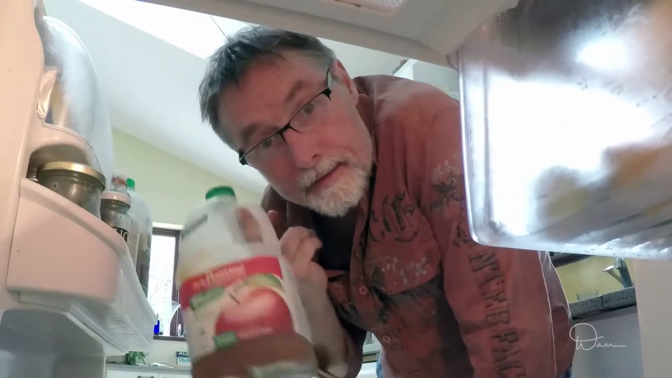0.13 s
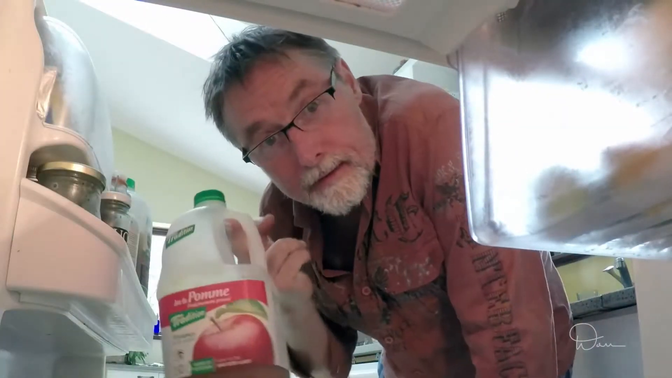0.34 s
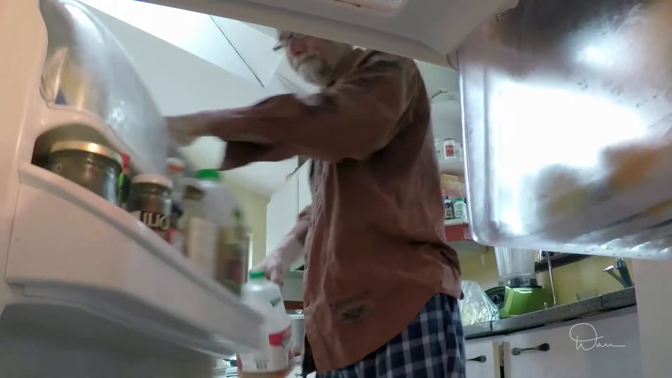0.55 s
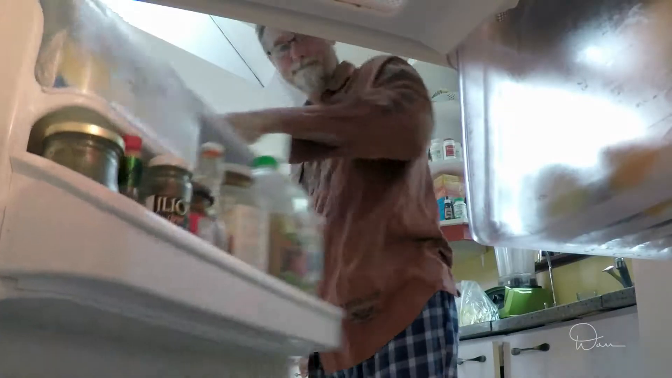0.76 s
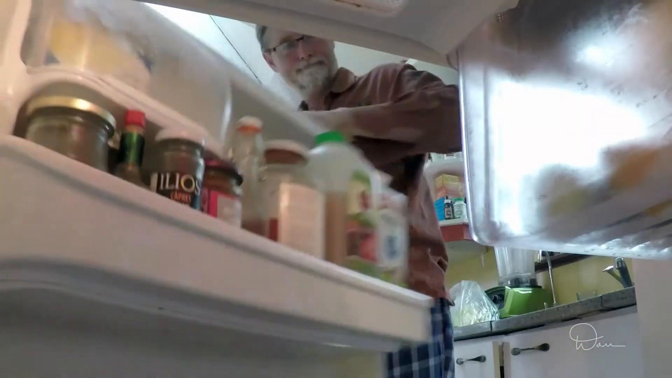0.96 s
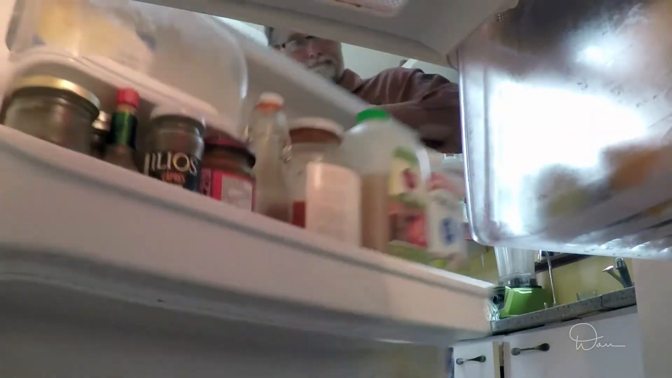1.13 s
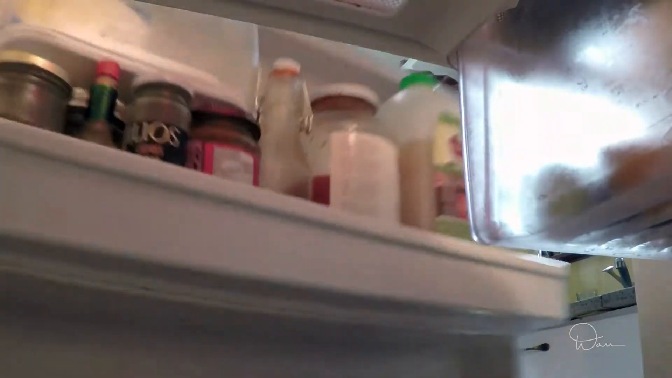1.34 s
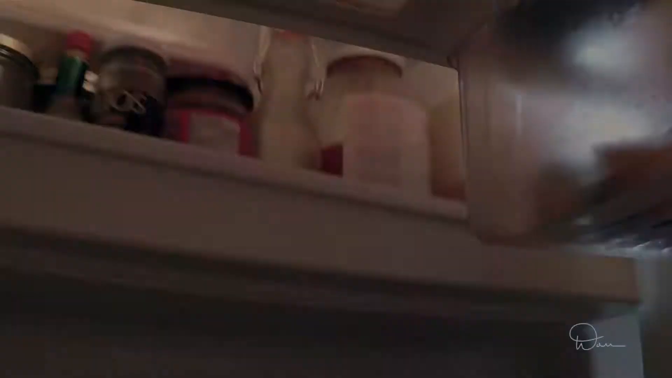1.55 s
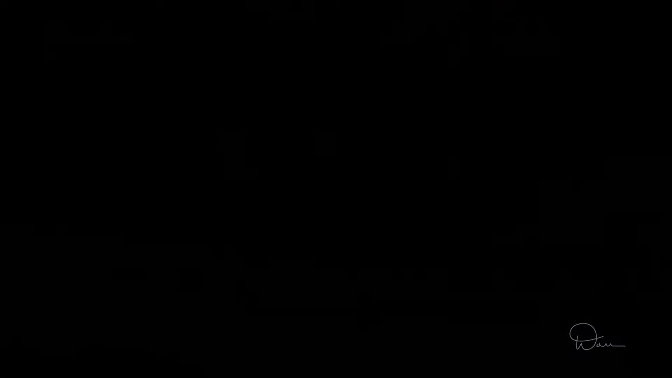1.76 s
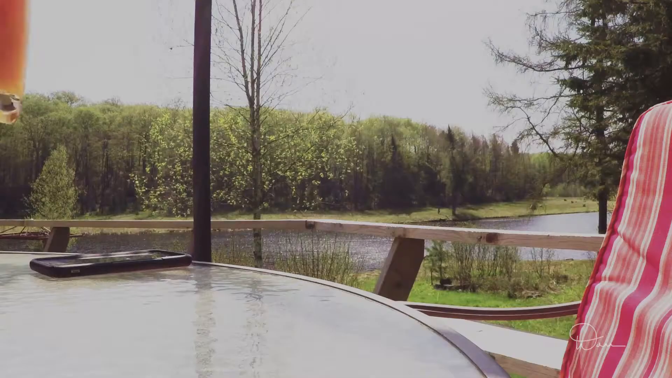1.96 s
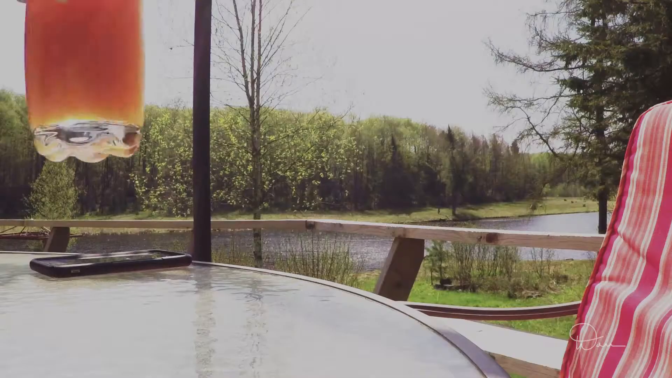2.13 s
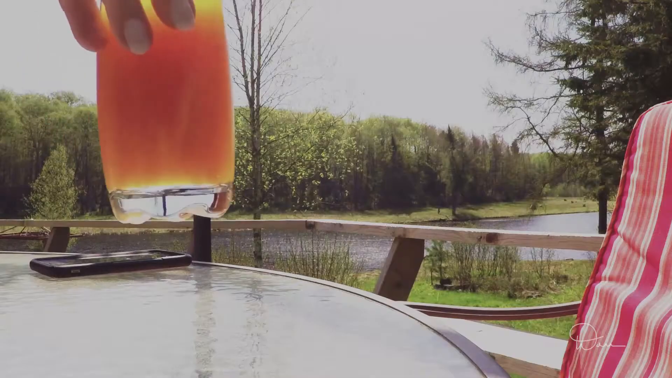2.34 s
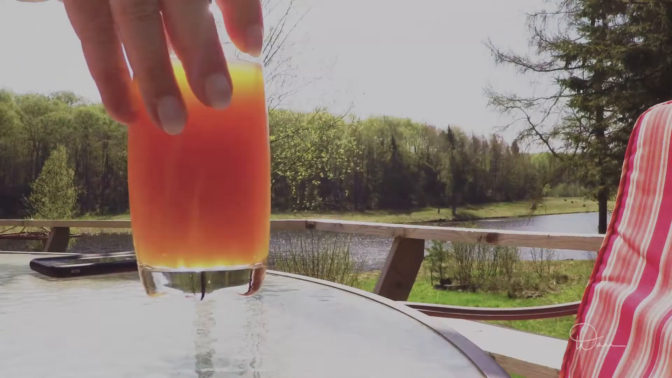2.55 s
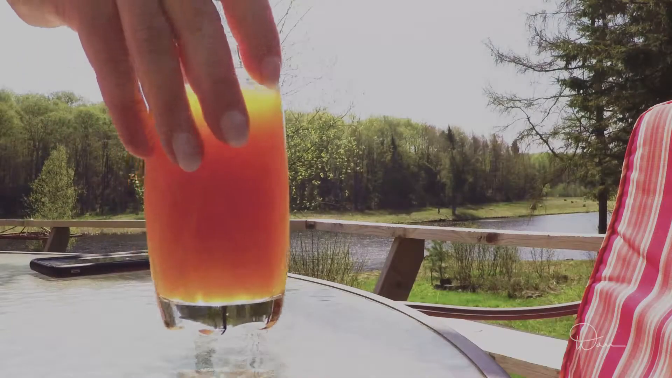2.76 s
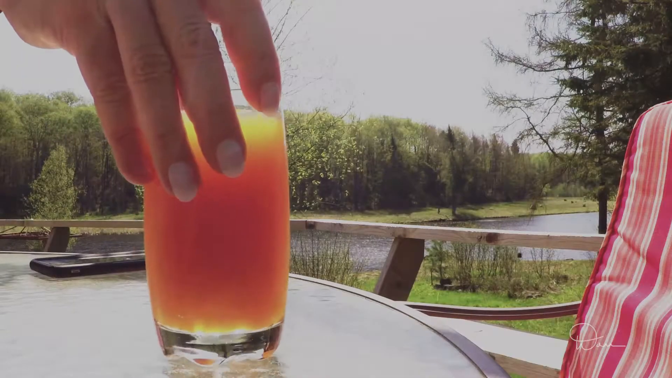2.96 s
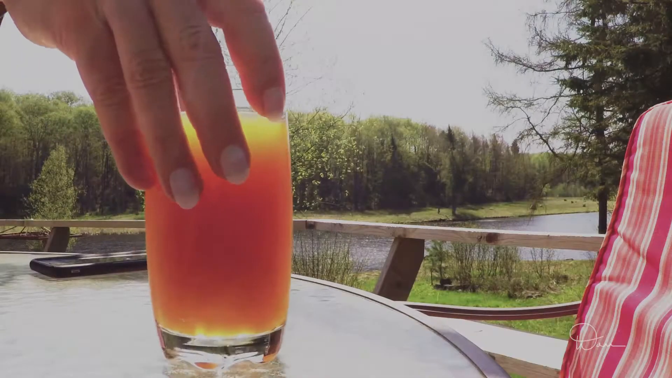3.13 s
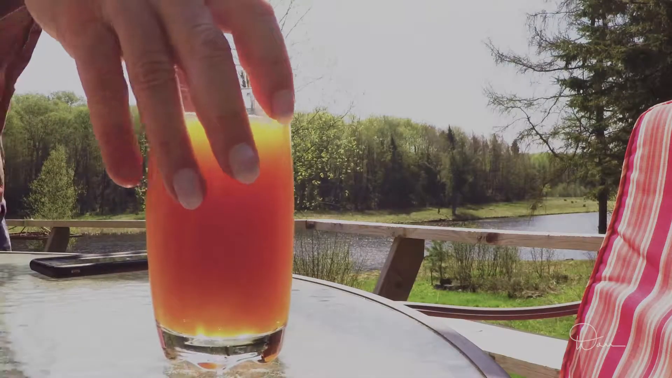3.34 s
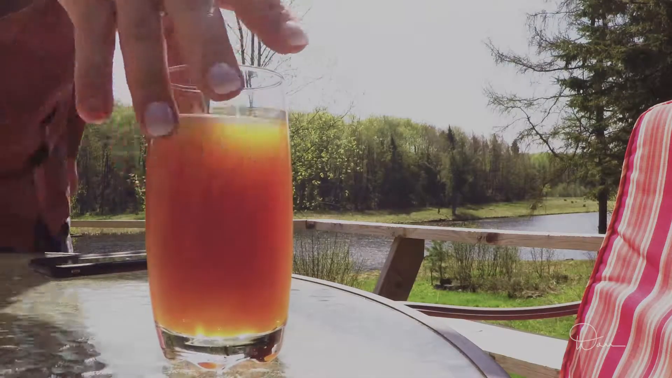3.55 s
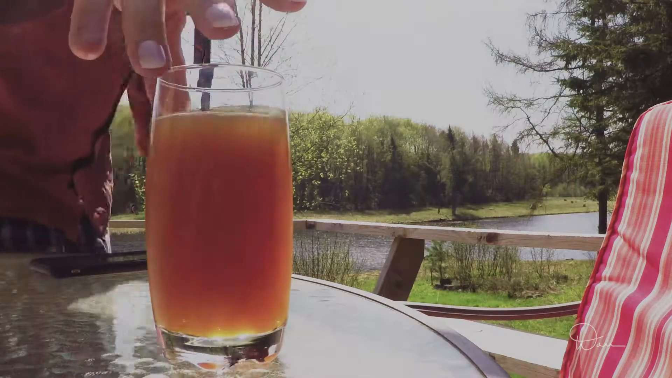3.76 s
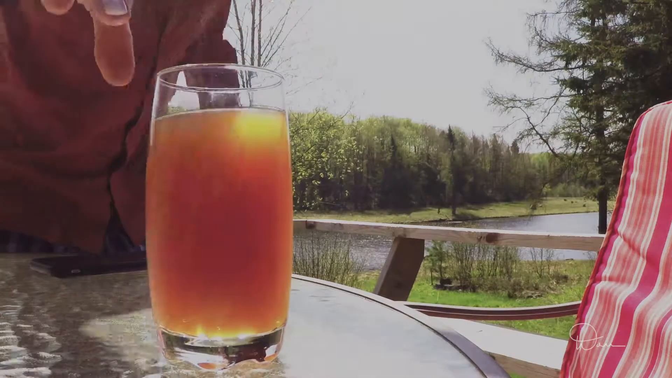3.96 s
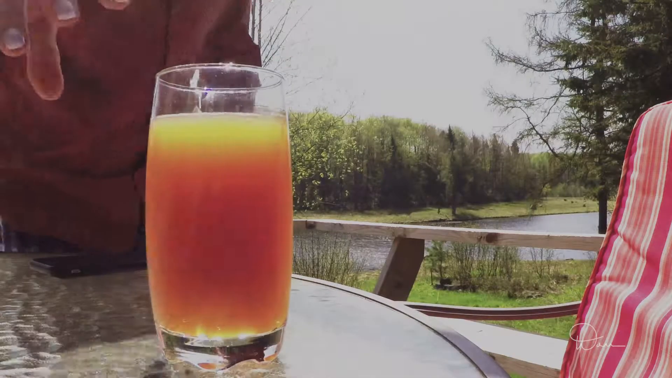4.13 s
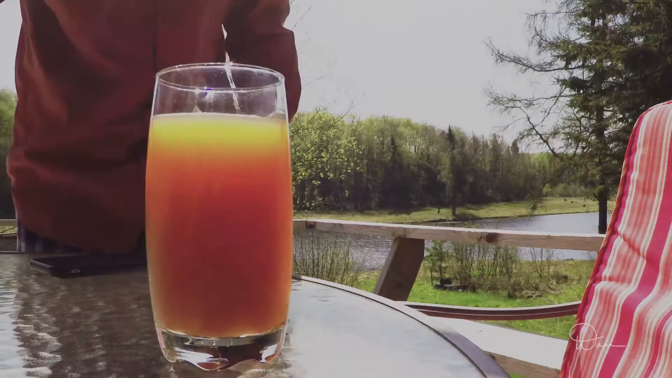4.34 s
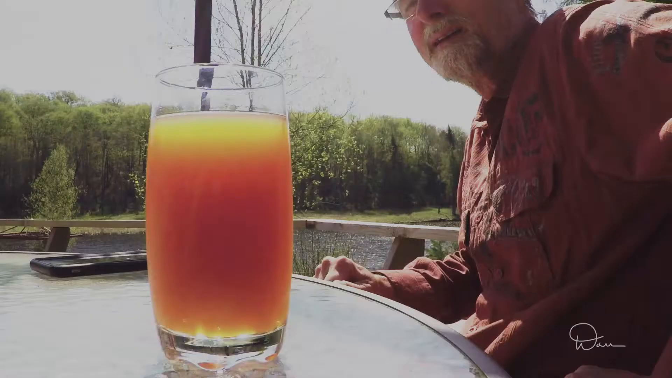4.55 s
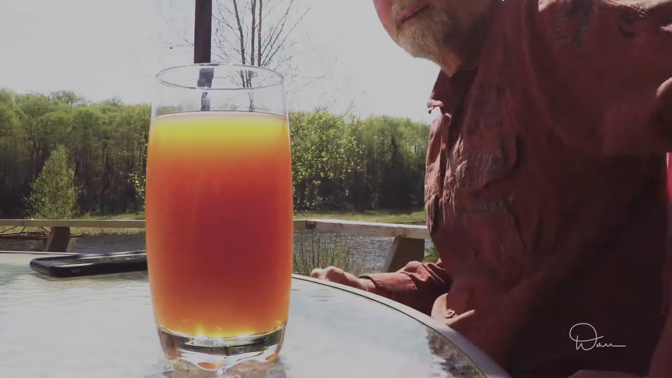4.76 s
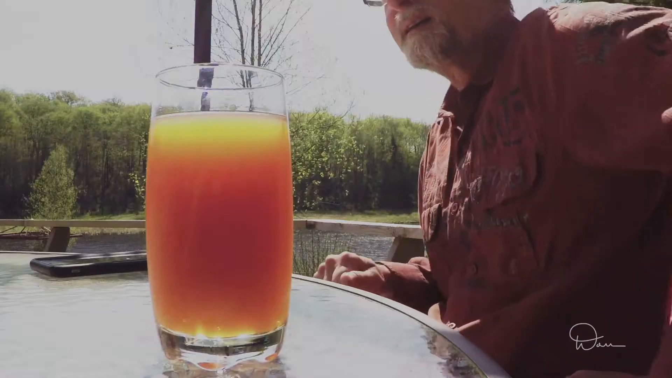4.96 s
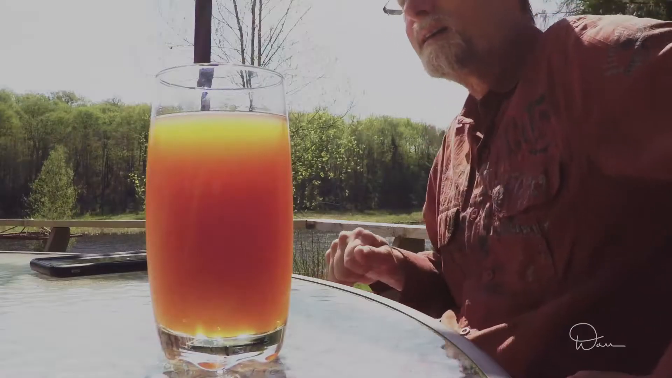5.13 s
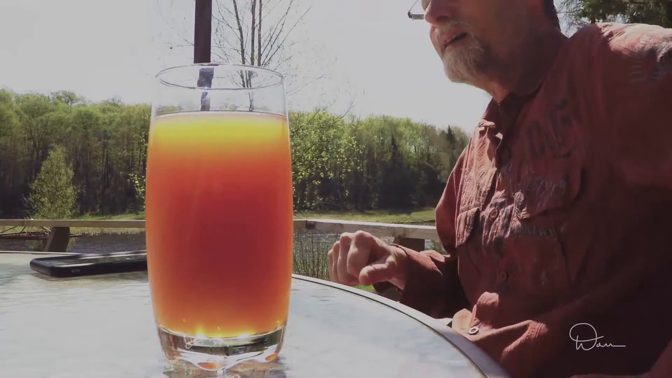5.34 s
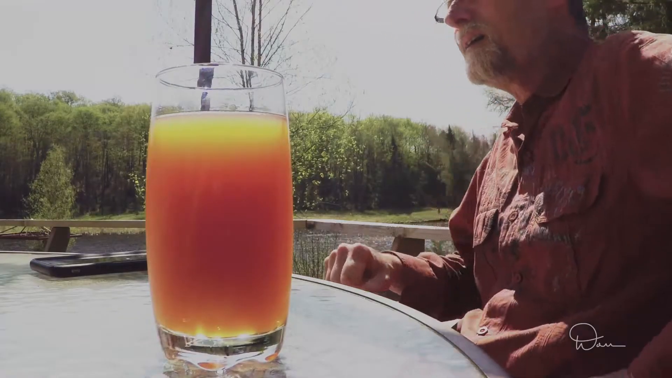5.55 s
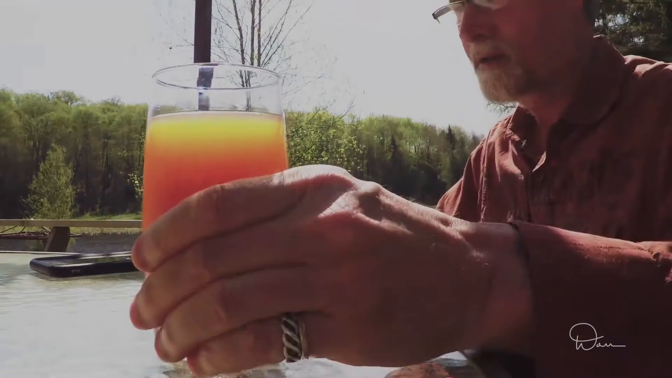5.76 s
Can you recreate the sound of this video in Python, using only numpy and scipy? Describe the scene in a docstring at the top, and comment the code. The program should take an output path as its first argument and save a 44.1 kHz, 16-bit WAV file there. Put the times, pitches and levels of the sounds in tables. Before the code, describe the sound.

A few light knocks, a bottle clink and a short scrape sound close to a microphone inside a refrigerator. Then the door latches with a loud thud, shaking the jars. Quiet open air fades in, with hiss, wind rumble and faint insects. A glass is set down on a glass table, a chair knocks and rustles softly on a wooden deck, and a finger ring lightly taps the glass.

```python
"""A refrigerator door, heard from inside, latches and slams after knocks, clinks and a shelf's scrape;
the jars rattle. Each impact excites damped modes; the scrape is stick-slip friction. A hard cut leads
to a wooden deck that fades in: a glass is set on a glass table, a chair knocks and rustles, a step
thumps and a finger ring taps the glass. An insect trills and chirps over hum, hiss, far insects, a soft
pulse and a low rumble: wind on the microphone, swelling as the deck rumbles after the thumps."""
import sys
import numpy as np
from scipy import signal
from scipy.io import wavfile
from scipy.ndimage import uniform_filter1d

SR = 44100
rng = np.random.default_rng(int(sys.argv[2]) if len(sys.argv) > 2 else 0)


def output_pcm(signal):
    """Save a mono or channel-first signal as 16-bit PCM at the path in sys.argv[1].

    Samples are clipped to [-1, 1] before scaling.
    """
    pcm = np.clip(np.atleast_2d(signal).T, -1, 1) * 32767
    wavfile.write(sys.argv[1], SR, np.round(pcm).astype(np.int16))


N = 255780
TIME = np.arange(N) / SR
EDGES_HZ = 22 * 2 ** np.arange(0, 9.7, 1 / 3)
CENTRES_HZ = np.sqrt(EDGES_HZ[1:] * EDGES_HZ[:-1])
CUT_S, HISS_DB = 2.18, -67.5

def from_db(db):
    """Amplitude ratio of a level in decibels."""
    return 10 ** (np.asarray(db) / 20)

def rms_one(x):
    """Normalisation to unit rms."""
    return x / np.sqrt(np.mean(x ** 2) + 1e-20)

def in_time(rows):
    """Linear interpolation of each column over time."""
    times, *columns = np.transpose(rows)
    return [np.interp(TIME, times, column) for column in columns]

def at_hz(points, hz=CENTRES_HZ):
    """Interpolation on a log-frequency axis."""
    known_hz, values = np.transpose(points)
    return np.interp(np.log(hz), np.log(known_hz), values)

def during(start_s, end_s):
    """A time gate with 1 ms ramps."""
    return np.clip(np.minimum(TIME - start_s, end_s - TIME) * 1000, 0, 1)

def drift(rate_hz):
    """Slow random modulation: low-passed noise of unit rms."""
    r = np.exp(-80 * np.pi * rate_hz / SR)
    slow = signal.lfilter([1], [1, -2 * r, r * r], rng.standard_normal(N // 40 + 2002))[2000:]
    return np.interp(np.arange(N) / 40, np.arange(len(slow)), rms_one(slow))

def filtered(x, order, hz, kind):
    """A maximally flat filter."""
    return signal.sosfilt(signal.butter(order, hz, kind, fs=SR, output="sos"), x)

def bands(sources):
    """Third-octave analysis, the bands drawing on the sources in turn."""
    return [filtered(sources[k % len(sources)], 2, edges, "band")
            for k, edges in enumerate(zip(EDGES_HZ, EDGES_HZ[1:]))]

def colour(bank, spectrum):
    """Spectral shaping: a weighted sum of bands, at unit rms."""
    return rms_one(sum(gain * band for gain, band in zip(from_db(at_hz(spectrum)), bank)))

def grains(per_s, spread_db):
    """Shot noise: random impulses of uneven size, at unit rms."""
    sizes = from_db(spread_db * np.minimum(rng.exponential(1, N), 5)) * rng.choice([-1, 1], N)
    return rms_one(sizes * (rng.random(N) < per_s / SR))

def clicks(blows):
    """Ideal impulses from rows of time_s, level_db."""
    out = np.full(N, 1e-18)
    for s, db in blows:
        out[round(s * SR)] += from_db(db)
    return out

def ring(drive, modes):
    """Modal superposition: damped resonators of alternating sign share one drive."""
    out = np.zeros(N)
    for k, (hz, db, t60) in enumerate(modes):
        r, w = from_db(-60 / (max(t60, .003) * SR)), 2 * np.pi * hz / SR
        response = signal.lfilter([0, np.sin(w)], [1, -2 * r * np.cos(w), r * r], drive)
        out += (-1) ** k * from_db(db) * response
    return out

def mode_drives(blows, modes, spread_db):
    """Strike position weights the modes, so each gets its own uneven impulses."""
    favour_db = rng.normal(0, spread_db, (len(blows), len(modes)))
    return [clicks(np.array(blows) + np.outer(column, [0, 1])) for column in favour_db.T]

def damped(blows, modes, drop_db):
    """Contact damping: a touch lowers each ring within 10 ms."""
    return sum(ring(clicks([(s, db)]), modes) * from_db(-drop_db * ((TIME - touch_s) / 0.01).clip(0, 1))
               for s, db, touch_s in blows)

def dense_body(bank, blows, spectrum, t60s, build_s):
    """High modal density: each noise band builds through the contact, then decays at its own rate."""
    out = np.zeros(N)
    shape_db = at_hz(spectrum)
    region = np.digitize(CENTRES_HZ, [600, 3500])  # bass, middle, treble
    power = from_db(2 * shape_db) * np.diff(EDGES_HZ) / (SR / 2)
    totals_db = 10 * np.log10([power[region == k].sum() for k in range(3)])
    for s, level_db, bass_db, treble_db, t60_ratio in blows:
        at = round(s * SR)
        t = TIME[:min(N - at, SR * 3 // 4)]
        contact_s = build_s * from_db(-0.15 * treble_db)  # duller blows build more slowly
        tilt_db = level_db + np.array([bass_db, 0, treble_db]) - totals_db
        bands_db = shape_db + at_hz(list(zip([220, 1450, 7000], tilt_db)))
        for band, db, t60, hz in zip(bank, bands_db, at_hz(t60s) * t60_ratio, CENTRES_HZ):
            rise_s = max(contact_s, 1 / hz)  # lows need a cycle to build up
            envelope = np.minimum(t / rise_s, 1) * from_db(db - 60 * np.maximum(t - rise_s, 0) / t60)
            out[at:at + len(t)] += band[at:at + len(t)] * envelope
    return out

# Cabinet blows: start_s, level_db, bass_offset_db, treble_offset_db, t60_ratio
CABINET_BLOWS = [(0, -59, 0, -1.5, 5.5), (0.4, -60.5, 5, -4, 8), (0.432, -35.5, 6, 5, 0.65),
                 (0.546, -43.5, -5.5, 6.5, 0.51), (0.608, -54.5, 13, -34, 0.36),
                 (0.882, -38.5, -5, -31, 0.43), (1.024, -53.5, -22, 13, 0.58), (1.121, -51.5, 4, -5, 0.56),
                 (1.334, -51, 0.5, -14, 0.46), (1.521, -48.5, -1.5, -28, 0.35),
                 (1.61, -58, 16.5, -23.5, 0.6), (1.642, -40.5, 1.27, -17.5, 0.93),
                 (1.712, -43.5, 4.5, -19, 0.37), (1.736, -44.5, 8, -3, 0.59), (1.775, -7.5, -16, -7, 0.4),
                 (1.845, -31.5, 1.5, -2.5, 0.14), (1.854, -18.5, -2.5, 11, 0.63),
                 (1.873, -18, -1.5, 1.5, 1.3), (2.042, -35, -5, 6.5, 0.21), (2.145, -33, -12, -26.5, 0.31),
                 (2.16, -51, 11, -4, 0.57)]
# Cabinet spectrum: frequency_hz, density_db
CABINET_SPECTRUM = [(40, -41), (100, -19), (243, 0), (500, -7), (1210, -5.5), (1430, -8), (2200, -4.5),
                    (4740, -9), (5610, -15.5), (8850, -13.5), (12000, -29.5), (15400, -23.5)]
# Cabinet decay: frequency_hz, t60_s
CABINET_DECAY = [(80, 0.46), (300, 0.42), (1000, 0.41), (3000, 0.15), (8000, 0.21), (14000, 0.028)]
def cabinet_knocks(bank):
    """Impacts excite the cabinet's overlapping modes."""
    return dense_body(bank, CABINET_BLOWS, CABINET_SPECTRUM, CABINET_DECAY, build_s=0.0015)

# Fan and kitchen air: time_s, level_db
AIR_LEVELS = [(0, -56), (.35, -60), (.6, -56.5), (.85, -58.5), (2.18, -60.5)]
# Air spectrum: frequency_hz, density_db
AIR_SPECTRUM = [(30, -47.5), (75, -23.5), (242, -0.5), (397, 0), (800, -9.5), (1160, -11.5), (5000, -17.5),
                (5800, -22.5), (9000, -18), (11000, -30), (14000, -32), (15400, -42)]
def fan_air():
    """Moving air radiates broadband noise."""
    air = colour(bands(rng.standard_normal((2, N))), AIR_SPECTRUM)
    return air * from_db(in_time(AIR_LEVELS)[0] + drift(18))

# Trembling jar: pitch_hz, gain_db, t60_s
TREMBLING_MODES = [(1900, -3, 0.086), (1995, 3.5, 0.085), (2324, -8, 0.065), (3720, -12, 0.15),
                   (4500, -7, .04), (4830, -6, 0.04)]
def trembling_jar(loss_db_per_s=68):
    """Forced vibration: fading contacts with a neighbour drive a jar."""
    contacts = grains(3000, 1.0) * from_db(-76.5 - loss_db_per_s * TIME)
    return ring(contacts, TREMBLING_MODES) * (TIME < 0.4)

# Plastic bin: pitch_hz, gain_db, t60_s
BIN_MODES = [(224, -4, 0.027), (337, 1, 0.081), (645, -13.5, 0.15), (1120, -7.5, 0.073), (1746, -8, 0.042),
             (4330, -9.5, 0.046), (5040, -9.5, 0.068)]
# Bin impact: start_s, level_db
BIN_HITS = [(.435, -20.5)]
def door_bin():
    """Internal damping keeps the ring of plastic short."""
    return ring(clicks(BIN_HITS), BIN_MODES)

# Bottle: pitch_hz, gain_db, t60_s
BOTTLE_MODES = [(1930, -2.5, 0.13), (2290, -12, 0.51), (3840, -3, 0.068), (4800, -3.5, 0.14),
                (6370, 9, 0.042), (7200, -5, .04), (8900, -2.5, 0.096)]
# Bottle impact: start_s, level_db, touch_s
BOTTLE_HITS = [(0.55, -34, 0.598)]
def bottle_clink():
    """Glass vibrates freely until a contact damps it."""
    return damped(BOTTLE_HITS, BOTTLE_MODES, drop_db=30)

# Shelf friction: frequency_hz, density_db
SCRAPE_SPECTRUM = [(300, -11), (1480, 0), (3000, -1), (4800, 7.5), (5900, -5.5), (8490, 9.5), (11000, -13),
                   (15400, -9)]
def shelf_scrape(peak_s=0.9375, rise_db_per_s=124, fall_db_per_s=163):
    """Stick-slip friction: dense tiny slips swell and fade as the shelf drags."""
    slips = colour(bands([grains(4400, 0.68), grains(6000, 0.71)]), SCRAPE_SPECTRUM)
    swell_db = np.minimum(rise_db_per_s * (TIME - peak_s), fall_db_per_s * (peak_s - TIME))
    ease_db = -4.5 * during(1.045, 9)  # the load comes off
    return slips * from_db(-33 + swell_db + ease_db) * during(.885, 1.11)

# Door panel: pitch_hz, gain_db, t60_s
DOOR_MODES = [(113, -7.5, 0.5), (183.8, 1, 0.28), (242.6, -0.5, 0.3), (398, -3, 0.3), (655, -10, 0.37),
              (730, -11, 0.49), (802, -13.5, 0.2), (1038, -10.5, 0.22), (1224, -10.5, 0.24)]
# Door impacts: start_s, level_db
DOOR_HITS = [(1.646, -41.5), (1.8, -33), (1.858, -14), (1.878, -19), (1.91, -24), (1.955, -24.5)]
def door_slam():
    """Plate modes, each wavering in level as the seal presses unevenly."""
    return sum(ring(clicks(DOOR_HITS), [mode]) * from_db(3 * drift(30)) for mode in DOOR_MODES)

# Latch: pitch_hz, gain_db, t60_s
LATCH_MODES = [(1786, 0.5, 0.015), (2920, 5, 0.0022), (8974, -13, 0.013)]
# Latch impacts: start_s, level_db
LATCH_HITS = [(1.777, -5.5), (1.78, -10), (1.857, -8.5)]
def latch():
    """Heavily damped high modes are heard as clicks."""
    return ring(clicks(LATCH_HITS), LATCH_MODES)

# Jars: pitch_hz, gain_db, t60_s
JAR_MODES = [(1960, -9, 0.13), (1890, -10, 0.18), (2000, -15, 0.37), (2056, -12, 0.22), (2342, -10, 0.077),
             (2468, -11.5, 0.1), (2513, -7.5, 0.24), (4120, -16, 0.05), (5000, -12, .03), (6350, -19, .03),
             (8650, -15, .03)]
# Clearest collisions: start_s, level_db
JAR_HITS = [(1.882, -17), (1.895, -19), (1.968, -27), (1.99, -28.5), (2.046, -38.5)]
def jar_rattle(start_s=1.86, settle_s=1.983):
    """Random collisions excite cabinet and jars; the jars lean together, so each mode wavers."""
    loss_db = 28 * (TIME - start_s) + 187 * np.maximum(TIME - settle_s, 0)
    shaking = from_db(-loss_db) * (TIME > start_s)
    clatter = colour(bands([grains(3600, 1.0)]), CABINET_SPECTRUM) * from_db(-30 + 2 * drift(46))
    contacts = grains(800, 2.0) * from_db(-51) * shaking
    drives = mode_drives(JAR_HITS, JAR_MODES, spread_db=2.1)
    jars = sum(ring(contacts + drive, [mode]) * from_db(3.5 * drift(79))
               for drive, mode in zip(drives, JAR_MODES))
    return clatter * shaking + jars

# Small jar: pitch_hz, gain_db, t60_s
SMALL_JAR_MODES = [(4870, 0, 0.04), (7650, -7, 0.049)]
# Its impacts: start_s, level_db
SMALL_JAR_HITS = [(2.028, -26.5), (2.035, -30)]
def small_jar():
    """A small stiff body has high natural frequencies."""
    return ring(clicks(SMALL_JAR_HITS), SMALL_JAR_MODES)

# Carton: pitch_hz, gain_db, t60_s
CARTON_MODES = [(770, -1, 0.043), (1180, -3, 0.01)]
# Carton impacts: start_s, level_db
CARTON_HITS = [(2.148, -30), (2.161, -18.5)]
def carton():
    """Lossy walls turn impacts into dull taps."""
    return ring(clicks(CARTON_HITS), CARTON_MODES)

# Outdoor levels: time_s, rumble_db, hum_db
OUTDOOR_LEVELS = [(2.4, -67, -63.5), (3.0, -60.5, -63.5), (3.2, -49, -53), (3.8, -51.5, -64),
                  (4.1, -49.5, -60), (4.5, -55.5, -64), (5.3, -65, -60), (5.6, -63.5, -52.5),
                  (5.8, -66.5, -58)]
# Low rumble, far hum and hiss spectra: frequency_hz, density_db
RUMBLE_SPECTRUM = [(20, 20.5), (59, 10), (147, -9), (300, -36.5), (500, -69)]
HUM_SPECTRUM = [(71, 4), (120, 1.5), (243, -4), (595, -6.5), (964, -29.5), (2000, -70)]
HISS_SPECTRUM = [(530, -21), (990, -6.5), (1600, -6), (3500, -9), (4400, -11), (5200, -7), (7000, -16.5),
                 (10500, -20), (13500, -22), (15400, -9)]
def outdoor_noise():
    """Modulated noise: hum, hiss and a low wind rumble that swells as the deck rumbles after thumps."""
    rumble_db, hum_db = in_time(OUTDOOR_LEVELS)
    bank = bands(rng.standard_normal((2, N)))
    rumble = colour(bank, RUMBLE_SPECTRUM) * from_db(rumble_db + 4 * drift(3.1))
    hum = colour(bank, HUM_SPECTRUM) * from_db(hum_db + 3 * drift(27))
    hiss = colour(bank, HISS_SPECTRUM) * from_db(HISS_DB + .5 * drift(43.3))
    return rumble + hum + hiss

# Far insects: pitch_hz, gain_db, t60_s
CHORUS_MODES = [(9460, 9.5, 0.011), (14200, -7, 0.008)]
def far_insects(tick_s=0.0022):
    """Incoherent calls merge into two narrow noise bands and a crackle of high ticks."""
    thin = rms_one(ring(rng.standard_normal(N), CHORUS_MODES))
    gate = uniform_filter1d(np.abs(grains(70, 1.5)), size=round(tick_s * SR))
    ticks = rms_one(filtered(gate * rng.standard_normal(N), 2, [11000, 14000], "band"))
    return from_db(HISS_DB - 18) * thin + from_db(HISS_DB - 14) * ticks

def low_pulses(gap_s=.1024, width_s=0.0062):
    """A pulse train, probably radio pickup in the microphone lead: short dips that rebound slowly."""
    times = np.concatenate([np.arange(2.2792, 4.55, gap_s), np.arange(4.6596, 5.8, gap_s)])
    impulses = clicks(zip(times, -45.5 + rng.normal(0, 1.9, len(times))))
    dips = -np.convolve(impulses, np.hanning(round(width_s * SR)), "same")
    return filtered(dips, 1, 25.1, "high")

# Wing tones: pitch_hz, gain_db
WING_TONES = [(5620, -1), (13590, -11)]
# Chirps: start_s
CHIRP_STARTS = [3.84, 4.913, 5.0, 5.047, 5.148, 5.254, 5.388, 5.424, 5.505, 5.563, 5.615]
def insect(strokes_per_s=140, stroke_s=.0045):
    """Stridulation: each wing stroke is a tone burst; one trill, then chirps of two strokes."""
    trill = np.arange(2.346, 2.543, 1 / strokes_per_s)
    strokes = list(zip(trill, -62.5 + rng.normal(0, 1.67, len(trill))))
    strokes += [(s + k / strokes_per_s, -61) for s in CHIRP_STARTS for k in range(2)]
    envelope = np.convolve(clicks(strokes), np.hanning(round(stroke_s * SR)))[:N]
    warped_s = np.cumsum(1 + .006 * drift(25)) / SR  # the pitch wanders
    return envelope * sum(from_db(db) * np.sin(2 * np.pi * hz * warped_s) for hz, db in WING_TONES)

# Blows on table and deck: start_s, level_db, bass_offset_db, treble_offset_db, t60_ratio
DECK_BLOWS = [(3.025, -24.5, -1, -12.5, 0.81), (3.052, -24.5, -44, -21, 1.2), (3.174, -36, 2, -33, 1.06),
              (3.458, -33.5, -6.5, -26, 1.12), (3.966, -54, 9, -45, 1.74), (4.266, -55, -2, -35, 0.46),
              (4.574, -58, 10.5, 11, 0.66)]
# Deck spectrum: frequency_hz, density_db
DECK_SPECTRUM = [(24, -22), (40, -13), (105, 5), (198, 3.5), (276, 1), (467, 4.5), (700, -6), (1210, -21),
                 (1600, -21), (2500, -19), (4300, -34.5), (6500, -55.5)]
# Deck decay: frequency_hz, t60_s
DECK_DECAY = [(60, 0.89), (300, 0.4), (700, 0.33), (1500, 0.18), (3000, 0.16), (8000, 0.06)]
def deck_thumps(bank):
    """Damping in wood rises with frequency, so the bass lasts longest."""
    return dense_body(bank, DECK_BLOWS, DECK_SPECTRUM, DECK_DECAY, build_s=0.00039)

# Glass table top: pitch_hz, gain_db, t60_s
TABLE_MODES = [(154, -12, 0.3), (199, -8.5, 0.51), (266, -18, 0.23), (353, -19, 1), (466, -4.5, 0.29),
               (660, -12.5, 0.24), (958, -17.5, 0.27), (2066, -4.5, 0.1), (2313, -5.5, 0.13),
               (2556, -13, 0.2), (2738, -8, 0.13), (2923, -9, 0.065), (3170, -13, 0.086), (4225, -19, 0.12)]
# The base of the glass rocks down: start_s, level_db
TABLE_HITS = [(3.0255, -20.5), (3.036, -30.5), (3.19, -47)]
def glass_table():
    """Plate bending modes: each blow lands at another spot and favours other modes."""
    drives = mode_drives(TABLE_HITS, TABLE_MODES, spread_db=3.5)
    return sum((-1) ** k * ring(drives[k], [mode]) for k, mode in enumerate(TABLE_MODES))

def base_chatter():
    """Light contacts of the settling glass excite only the table's high modes."""
    contacts = grains(600, 2.5) * from_db(-63.5) * during(3.027, 3.09)
    return ring(contacts + 1e-18, TABLE_MODES[7:])

# Drinking glass: pitch_hz, gain_db, t60_s
GLASS_MODES = [(4230, 0, 0.14)]
# Its tinks: start_s, level_db
GLASS_HITS = [(3.176, -64.5), (3.462, -54.5)]
def drinking_glass():
    """A single shell mode decays freely."""
    return ring(clicks(GLASS_HITS), GLASS_MODES)

# Chair frame: pitch_hz, gain_db, t60_s
CHAIR_MODES = [(240, -9, 1.1), (298, -6, 0.81), (372, -10, 0.62), (573, 3, 0.19), (640, -6.5, 0.49)]
# Frame impact: start_s, level_db
CHAIR_HITS = [(3.461, -35.5)]
def chair_frame():
    """Lightly damped low modes ring on after a knock."""
    return ring(clicks(CHAIR_HITS), CHAIR_MODES)

# Deck board: pitch_hz, gain_db, t60_s
BOARD_MODES = [(395.6, 3.5, 0.1), (458, -9, 0.2), (637, -3, 0.093), (697, -5, 0.2), (837, -7, 0.17)]
# Footfall: start_s, rise_s, board_gain_db, scuff_db
FOOTFALLS = [(3.961, 0.023, -40, -64.5)]
def footstep(contact_t60_s=0.17, scuff_t60_s=0.33):
    """Gradual loading: rough contact drives the board's modes while the sole scuffs."""
    rough = grains(900, 2.7)
    sole = rms_one(filtered(grains(5000, 2.5), 2, (2280, 3850), "band"))
    out = np.zeros(N)
    for s, rise_s, board_gain_db, scuff_db in FOOTFALLS:
        weight = ((TIME - s) / rise_s).clip(0, 1)
        after_s = np.maximum(TIME - s - rise_s, 0)
        force = rough * weight * from_db(-60 * after_s / contact_t60_s)
        out += from_db(board_gain_db - 20) * rms_one(ring(force + 1e-18, BOARD_MODES))
        out += sole * np.sqrt(weight) * from_db(scuff_db - 60 * after_s / scuff_t60_s)
    return out

# Hollow chair leg: pitch_hz, gain_db, t60_s
LEG_MODES = [(368.7, -2.5, 0.46), (459, -7.5, 0.17), (604, -12, 0.12), (840, -11.5, 0.049),
             (1156, -17, .05)]
# Leg impacts: start_s, level_db, touch_s
LEG_HITS = [(4.577, -33, 4.612), (4.637, -42, 3.8)]
def chair_leg():
    """A tube resonates until contact damps it; the second knock is muted from the start."""
    return damped(LEG_HITS, LEG_MODES, drop_db=19)

# Chair cloth: frequency_hz, density_db
CLOTH_SPECTRUM = [(800, 10), (1400, -5), (2700, -2.5), (4500, -1), (7500, -17)]
def chair_rustle(bank, start_s=4.59, peak_s=4.72, end_s=4.95):
    """Friction in cloth makes noise that swells and subsides."""
    level_db = np.interp(TIME, [start_s, peak_s, end_s], [-64, -58, -64])
    return colour(bank, CLOTH_SPECTRUM) * from_db(level_db + drift(28)) * during(start_s, end_s)

# Full glass under a hand: pitch_hz, gain_db, t60_s
HELD_GLASS_MODES = [(849, -4, 0.15), (2000, -3, 0.016), (2770, -2, 0.058)]
# Finger ring taps: start_s, level_db
RING_HITS = [(5.654, -52.5), (5.745, -63)]
def ring_taps():
    """A finger ring excites glass modes that the hand damps."""
    return ring(clicks(RING_HITS), HELD_GLASS_MODES)

def fridge(bank):
    """Superposition of the refrigerator's sources, with one brief dropout."""
    out = cabinet_knocks(bank) + door_bin() + door_slam() + latch() + jar_rattle() + small_jar()
    out += carton() + trembling_jar() + bottle_clink() + shelf_scrape() + fan_air()
    out = filtered(out, 4, 72, "high")  # the microphone drops the deep bass
    return out * (1 - during(.385, .4))

def deck(bank):
    """Superposition of the outdoor sources."""
    knocks = deck_thumps(bank) + glass_table() + footstep() + base_chatter()
    knocks += chair_frame() + chair_leg()
    out = filtered(knocks, 2, 8000, "low")  # soft contacts carry no top
    out += drinking_glass() + ring_taps() + outdoor_noise() + chair_rustle(bank)
    return out + low_pulses() + insect() + far_insects()

def scene(fade_in_s=0.55):
    """Two places in turn: the refrigerator cuts off and the deck fades in."""
    bank = bands(rng.standard_normal((2, N)))
    fade_in = np.clip((TIME - CUT_S) / fade_in_s, 0, 1)
    return (fridge(bank) * during(-1, CUT_S) + deck(bank) * fade_in)[None]

def record(dry, cutoff_hz=15900):
    """Saturation rounds the loudest peaks; a steep low-pass limits the bandwidth."""
    clipped = dry / (1 + np.abs(dry) ** 6) ** (1 / 6)
    return signal.sosfilt(signal.cheby2(12, 70, cutoff_hz, fs=SR, output="sos"), clipped)

dry = scene()
out = record(dry)
output_pcm(out)
```